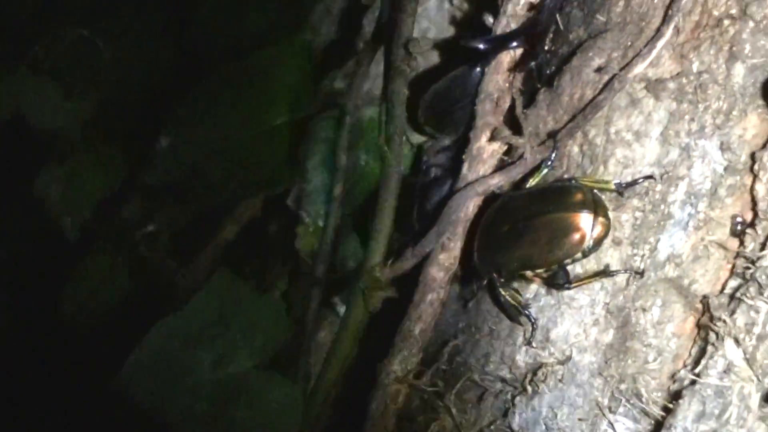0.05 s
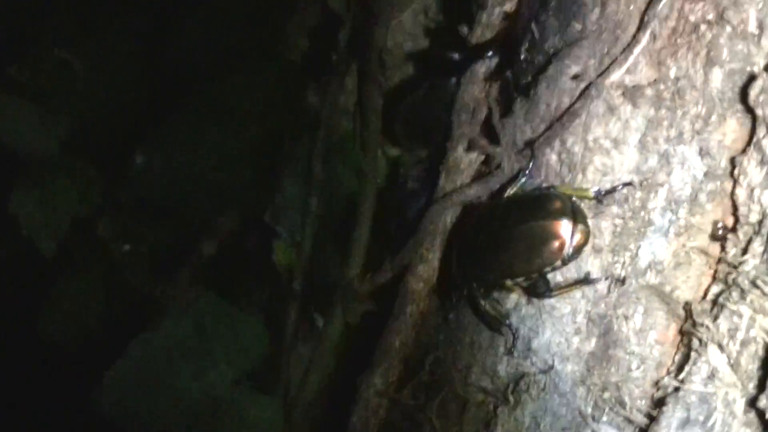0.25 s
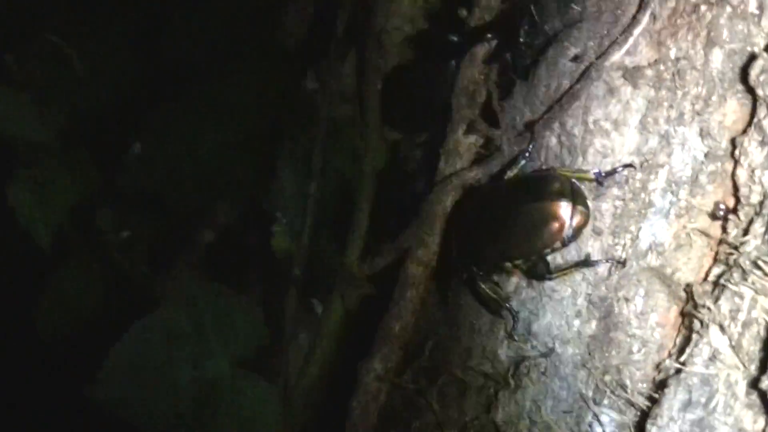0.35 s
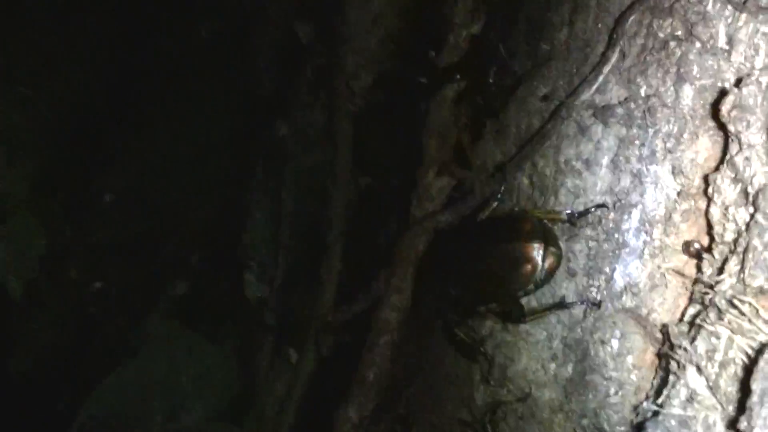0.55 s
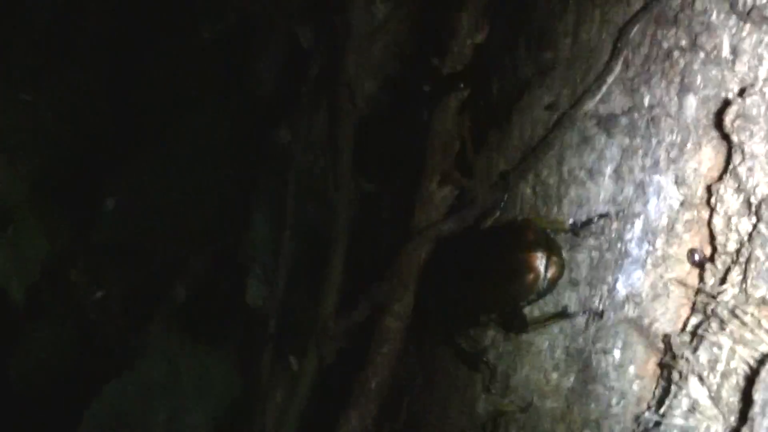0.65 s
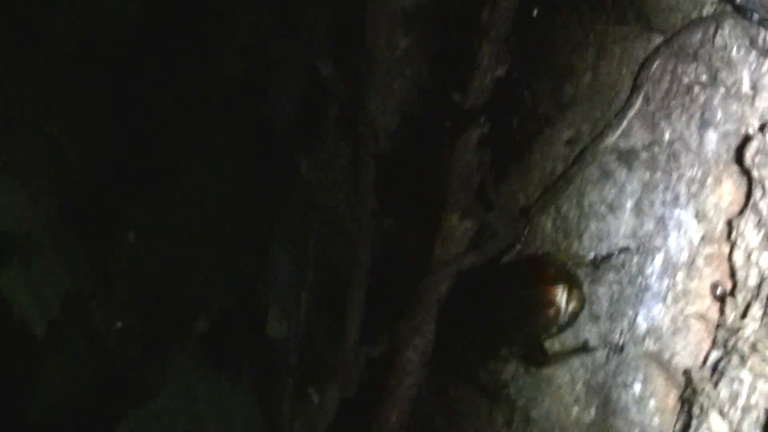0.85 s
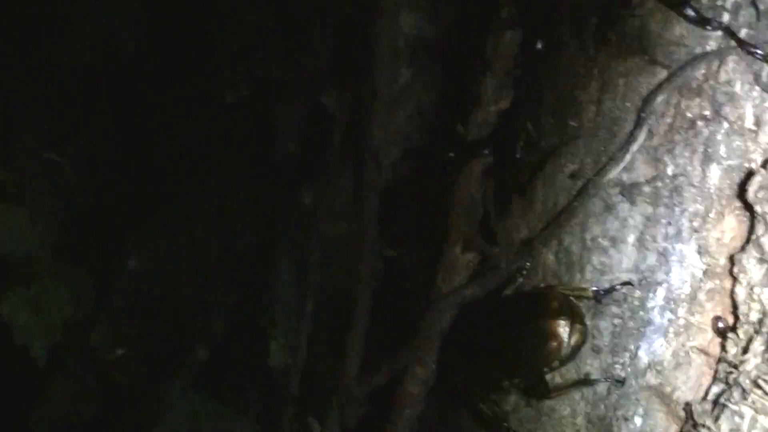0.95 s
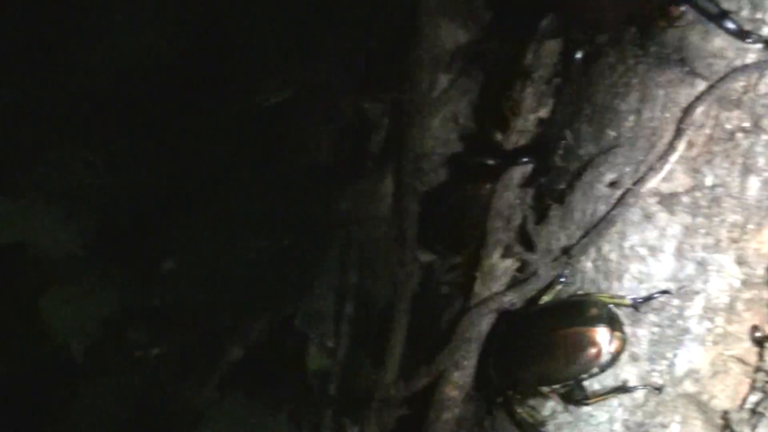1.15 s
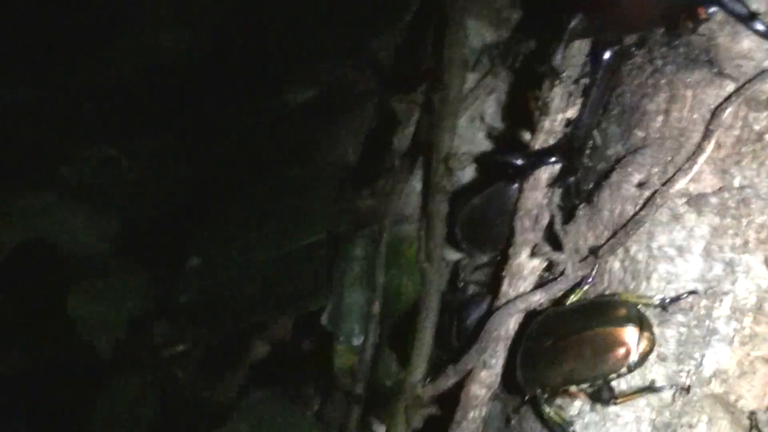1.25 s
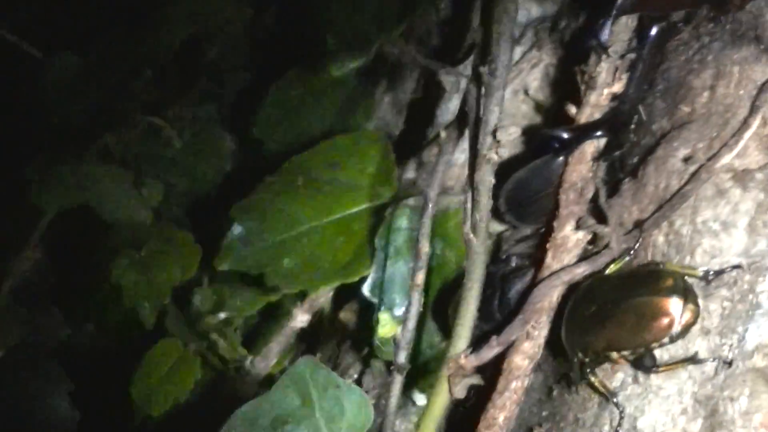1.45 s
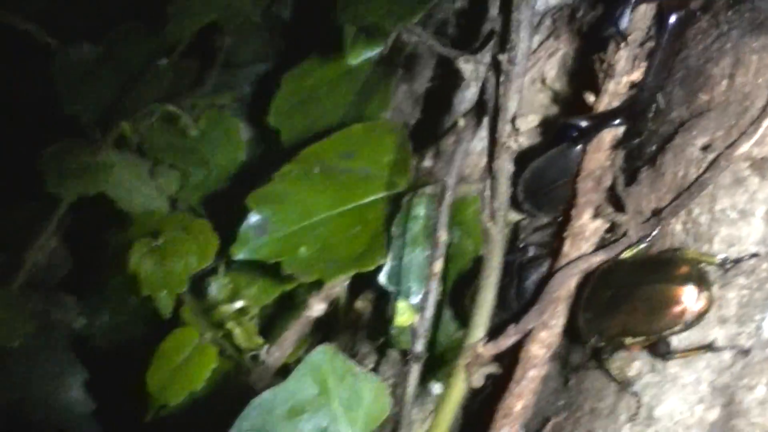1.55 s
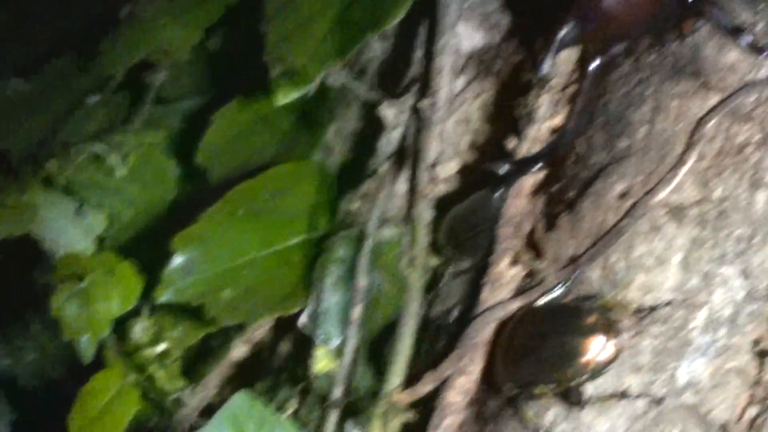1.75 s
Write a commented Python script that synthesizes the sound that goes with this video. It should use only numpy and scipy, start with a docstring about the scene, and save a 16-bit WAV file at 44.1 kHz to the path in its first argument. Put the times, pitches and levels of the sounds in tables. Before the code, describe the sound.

Close handling noise on a small hard casing: a sharp snap, scattered light ticks, then a cluster of clicks with a scrape and a brief rustle. Behind it, a quiet wood at night rumbles low, with distant trilling and high insect buzzes.

```python
"""A low rumble with a faint hum, far trilling crickets and very high bush-cricket buzzes: a wood at night.
The buzzes are tooth strikes ringing tiny wings; a second insect gives one hissing call.
Close by, small clicks, creaks and scrapes, as of a camera and lamp being handled, all ring one small
hard casing; one snap is far louder than the rest. Near the end something soft brushes past."""
import sys
import numpy as np
from scipy import signal
from scipy.fft import rfft, irfft, next_fast_len
from scipy.io import wavfile

SR = 44100
rng = np.random.default_rng(int(sys.argv[2]) if len(sys.argv) > 2 else 0)


def unload_wav(signal):
    """Save mono or channel-first audio to the path in sys.argv[1] as 16-bit WAV at rate SR, clipped to [-1, 1]."""
    wavfile.write(
        sys.argv[1],
        SR,
        np.round(np.clip(np.atleast_2d(signal).T, -1, 1) * 32767).astype(np.int16),
    )


N = 79380


def undb(db):
    """Decibels to gain."""
    return 10 ** (np.asarray(db) / 20)


def unit(x):
    """Scale to rms 1."""
    return x / np.sqrt(np.mean(x ** 2) + 1e-24)


def shape(x, response):
    """Filter by response(f), f in Hz."""
    size = next_fast_len(x.shape[-1] + 4096)
    f = np.fft.rfftfreq(size, 1 / SR) + 1e-6
    return irfft(rfft(x, size) * response(f), size)[..., :x.shape[-1]]


def resonance(f, hz, width_hz):
    """Response of one resonance, gain 1 at its centre."""
    return 1 / (1 + 1j * (f * f - hz * hz) / (f * width_hz))


def colour(x, points):
    """Filter by (frequency [Hz], gain [dB]) points, then scale to rms 1."""
    hz, db = np.array(points).T
    return unit(shape(x, lambda f: undb(np.interp(np.log(f), np.log(hz), db))))


def stereo_noise(correlation):
    """White noise, partly alike left and right."""
    mid, side = rng.standard_normal((2, N))
    return np.sqrt(1 + correlation) * mid + np.sqrt(1 - correlation) * side * np.array([[1], [-1]])


def drift(rate_hz):
    """Smooth random motion, rms 1."""
    return unit(shape(rng.standard_normal(N), lambda f: 1 / (1 + (f / rate_hz) ** 4)))


def swell(middle_s, length_s):
    """Half-cosine rise and fall."""
    return np.cos(np.pi * np.clip((np.arange(N) / SR - middle_s) / length_s, -.5, .5))


def add(track, x, start_s):
    """Mix a short sound into a track."""
    i = int(round(start_s * SR))
    track[i:i + len(x)] += x[:N - i]


def night_air():
    """Low rumble, thin hiss and a distant wavering hum."""
    # (frequency [Hz], relative density [dB])
    air_spectrum = [(20, -18.5), (45, -0.5), (100, -1), (200, -2), (400, -5), (700, -7.5), (1200, -13),
                    (2500, -17.5), (5000, -20.5), (8000, -21), (12000, -20.5), (15500, -38)]
    # (frequency [Hz], level [dB])
    hum_partials = [(100, -66), (200, -69.5), (300, -72.5), (402, -70)]
    air_db, swell_db, waver_hz = -50, -1.7, 3
    hum = 0
    for hz, db in hum_partials:
        phase = 2 * np.pi * np.cumsum(hz + waver_hz * drift(8)) / SR
        hum += undb(db) * np.sqrt(2) * np.sin(phase)
    air = colour(stereo_noise(0.24), air_spectrum)
    return air * undb(air_db + swell_db * drift(1)) + hum


def far_crickets():
    """Many distant trills merge into fluttering bands that slowly swell or sink."""
    # (centre [Hz], width [Hz], level [dB], flutter [dB], swell middle [s], swell [dB])
    choruses = [(3290, 200, -79, 3, 0.97, 12.5), (3835, 520, -67.5, 0, 1.9, 4.5),
                (5250, 750, -64, -4, .3, -1.5)]
    out = np.zeros((2, N))
    for hz, width_hz, db, flutter_db, middle_s, swell_db in choruses:
        band = shape(stereo_noise(0.69), lambda f: resonance(f, hz, width_hz) ** 2)
        trills = unit(band * undb(flutter_db * drift(27)))
        out += undb(db + swell_db * swell(middle_s, length_s=3.8)) * trills
    return out


def bush_crickets():
    """Fast tooth strikes ring a tiny wing: a comb of harmonics, each fading in and out through foliage."""
    # (middle [s], length [s], strike rate [Hz], wing pitch [Hz], level [dB])
    buzzes = [(.05, 1, 362, 12250, -63.5), (.5, .45, 369, 12500, -79), (0.843, 0.43, 370, 12650, -56),
              (1.25, 0.31, 372, 12100, -61.5), (1.75, 0.61, 370.5, 12450, -55)]
    harmonic_count, wing_width_hz = 11, 1500
    foliage_db, foliage_hz = 3, 22
    waver, jitter = .001, .0022  # fractions of the strike rate
    fades = [undb(foliage_db * drift(foliage_hz)) for _ in range(harmonic_count)]
    out = np.zeros((2, N))
    for middle_s, length_s, rate_hz, wing_hz, db in buzzes:
        strike_hz = rate_hz * (1 + waver * drift(8.3) + jitter * drift(210))
        phase = 2 * np.pi * np.cumsum(strike_hz) / SR
        lowest_harmonic = round(wing_hz / rate_hz) - harmonic_count // 2
        buzz = 0
        for k, fade in enumerate(fades, start=lowest_harmonic):
            wing_gain = abs(resonance(k * rate_hz, wing_hz, wing_width_hz))
            buzz += wing_gain * fade * np.sin(k * phase + 2 * np.pi * rng.random((2, 1)))
        out += undb(db) * swell(middle_s, length_s) * unit(buzz)
    return out


def touch(x, treble_hz, bass_hz, spot_hz, accent_db):
    """A soft contact loses treble, a light one loses bass; the touched spot adds an accent."""
    def response(f):
        low, high = 1j * f / treble_hz, 1j * f / bass_hz
        band = high ** 2 / (1 + high) ** 2 / (1 + np.sqrt(2) * low + low ** 2)
        return band * (1 + undb(accent_db) * resonance(f, spot_hz, width_hz=400))
    return shape(x, response)


def clicks():
    """Short pushes, each crunching as the contact gives way; returns forces on casing and stiff part."""
    # (time [s], relative level [dB], treble limit [Hz], bass limit [Hz], spot pitch [Hz],
    #  spot accent [dB], share to stiff part [dB])
    pushes = [(0.0804, -31, 2600, 1400, 1870, 9, -10), (0.2151, -15, 5400, 1180, 2180, -1, -6),
              (0.2177, -5, 9000, 910, 1180, 0.5, -4), (0.2187, -5.5, 2260, 1115, 1750, 0.5, -7.5),
              (0.2212, -25, 5000, 1200, 3000, -9, -12), (0.3499, -31, 4500, 1000, 1780, 4, -19),
              (0.3571, -27.5, 10000, 2500, 5070, 0, -12), (0.4723, -37.5, 3500, 700, 1630, 5, -32),
              (0.4809, -34.5, 3500, 700, 2800, 1.5, -20), (0.4896, -36.5, 3500, 700, 1700, 8, -20),
              (0.4975, -36, 3500, 700, 2300, -1, -18), (0.5324, -37, 9000, 2000, 5500, 6, -20),
              (0.5385, -31.5, 7900, 1500, 5400, 5, -6), (0.5494, -32.5, 4500, 900, 2930, -1, -20),
              (0.5533, -33, 8950, 2800, 5200, 18, -20), (0.5612, -25.5, 4430, 690, 2780, -22, -22),
              (0.6223, -21, 4500, 500, 1600, -8, -23), (0.6347, -28.5, 3480, 505, 1510, -1, -22),
              (0.6722, -31, 3500, 500, 1500, 0, -20), (0.6795, -33, 3980, 500, 2800, -10, -20),
              (0.6902, -37, 5000, 900, 1500, -1, -20), (0.6929, -27.5, 8000, 2500, 5200, 9.5, -20),
              (0.7316, -28.5, 3800, 497, 1500, -10, -26), (0.7456, -20.5, 3160, 520, 1490, -9, -20),
              (0.7661, -19.5, 2950, 517, 1500, -9.5, -18), (0.7969, -19, 2960, 496, 900, -14, -19),
              (0.9207, -35.5, 4550, 800, 2200, -3, -29), (1.1487, -30.5, 2700, 500, 880, 3.5, -6.5),
              (1.2674, -25, 3500, 1800, 3050, 8, -18), (1.2692, -21.5, 3380, 1490, 3100, -3, -5),
              (1.2841, -19.5, 3300, 1450, 2550, -15, 0), (1.3127, -22, 7140, 700, 1170, -1, -18),
              (1.3141, -17, 6600, 1180, 2870, 8, -14.5), (1.3183, -33, 4000, 1000, 1500, 16, -10),
              (1.3242, -34, 3950, 1200, 2500, -5, -10), (1.3947, -31, 5000, 1490, 3700, 11.5, -20)]
    gain_db = 23.5
    crunch_gain, crunch_decay_s, crunch_highpass_hz = .2, 0.00057, 3500
    casing_force, stiff_force = np.zeros((2, N))
    impulse = signal.unit_impulse(256, 8)
    age_s = (np.arange(len(impulse)) - np.argmax(impulse)) / SR
    crunch_envelope = crunch_gain * (age_s > 0) * np.exp(-age_s / crunch_decay_s)
    for time_s, db, *contact, stiff_db in pushes:
        crunch = crunch_envelope * rng.standard_normal(len(age_s))
        crunch = shape(crunch, lambda f: f ** 2 / (f ** 2 + crunch_highpass_hz ** 2))
        push = undb(db + gain_db) * touch(impulse + crunch, *contact)
        add(casing_force, push, time_s)
        add(stiff_force, undb(stiff_db) * push, time_s)
    return casing_force, stiff_force


def ring_modes(force, modes):
    """A force rings a set of modes, each with its own left-right balance."""
    sides = np.array([[.5], [-.5]])
    return shape(force, lambda f: sum(undb(db + sides * balance_db) * resonance(f, hz, width_hz)
                                      for hz, width_hz, db, balance_db in modes))


def scatter(ring):
    """Short diffuse tail of vibration scattered in the casing."""
    t60_s, rise_s, treble_hz, tail_db = 0.044, 0.0014, 5960, -14
    t = np.arange(SR // 10) / SR
    envelope = np.exp(-np.log(1000) * t / t60_s) * (1 - np.exp(-t / rise_s))
    tail = shape(rng.standard_normal((2, len(t))) * envelope, lambda f: 1 / (1 + 1j * f / treble_hz))
    tail = undb(tail_db) * unit(tail) / np.sqrt(len(t))
    return signal.fftconvolve(ring, tail, axes=1)[:, :N]


def casing(casing_force, stiff_force):
    """Pushes ring the casing with a scattered tail; its stiff part rings on, clean."""
    # all three: (frequency [Hz], width [Hz], gain [dB], left minus right [dB])
    casing_modes = [(443, 70, -6.5, 9), (590, 81, -8, -16), (862, 198, -2, 0.5), (1190, 290, -15.5, -7.5),
                    (1462, 355, -8, -1.5), (1756, 204, -7, -3.5), (2101, 202, 0.5, -5.5),
                    (2400, 100, -12.5, -12.5), (2950, 210, -7, -7), (3430, 200, -20, -9),
                    (3770, 230, -11.5, 14), (4400, 270, -16.5, -1)]
    contact_modes = [(5460, 500, -24.5, -13), (6330, 340, -21.5, -5), (8320, 1300, -15.5, -5),
                     (9940, 340, -24, -11)]
    stiff_modes = [(2112, 11, -6, -8), (2144, 30, 3.5, -8), (2222, 91, 1.5, -21.5), (2380, 88, -12, -5),
                   (2610, 62, -13, -7), (4280, 64, -14, 25), (6620, 110, -21, -14)]
    # all-pass bands that smear each push in time: (centre [Hz], width [Hz])
    dispersion = [(1200, 910), (2150, 1670), (3300, 1130), (4200, 1100), (6200, 990), (9000, 1200),
                  (12500, 1200)]
    # microphone's treble roll-off, dulling the clicks above 10 kHz: (frequency [Hz], gain [dB])
    mic_rolloff = [(20, 0), (10200, -3), (11200, -9), (13000, -7), (14200, -18), (16000, -28)]
    left_lag_s = 20e-6

    def response(f):
        smear = np.prod([1 - 2 * resonance(f, hz, width_hz) for hz, width_hz in dispersion], axis=0)
        return smear * undb(np.interp(f, *np.array(mic_rolloff).T))

    ring = ring_modes(casing_force, casing_modes + contact_modes)
    ping = ring_modes(stiff_force, stiff_modes)
    left, right = shape(ring + scatter(ring) + ping, response)
    return np.array([shape(left, lambda f: np.exp(-2j * np.pi * f * left_lag_s)), right])


def scrapes():
    """Swelling runs of tiny uneven slips; returns the force on the casing."""
    # (start [s], length [s], level [dB], treble limit [Hz], bass limit [Hz], spot pitch [Hz],
    #  spot accent [dB])
    strokes = [(0.088, 0.072, -45.5, 3000, 1000, 2000, -11), (0.254, 0.053, -42, 3500, 1400, 2170, 0),
               (.300, 0.067, -33.5, 4080, 910, 2920, -16), (0.388, 0.028, -42.5, 3500, 800, 1500, -11),
               (.465, 0.092, -47.5, 3480, 600, 1400, 6), (.508, .058, -33.5, 6370, 890, 5300, -3),
               (0.624, 0.094, -37.5, 2840, 497, 1050, -1), (1.138, 0.031, -41, 2830, 500, 900, -7.5),
               (1.334, 0.027, -20, 1880, 960, 1960, 2.5), (1.351, 0.11, -38, 4600, 600, 1310, -9)]
    slips_per_s, spread_db = 3300, 1.5
    force = np.zeros(N)
    for start_s, length_s, db, *contact in strokes:
        n = int(length_s * SR)
        slipping = rng.random(N) < slips_per_s / SR
        slips = (slipping * undb(spread_db * rng.standard_normal(N)))[:n]
        stroke = unit((slips - slips.mean()) * np.sin(np.linspace(0, np.pi, n)))
        add(force, undb(db) * touch(stroke, *contact), start_s)
    return force


def hissing_insect():
    """One call: a high band of rough noise rises and falls."""
    level_db, roughness_db = -52.5, 2
    rough = stereo_noise(0.092) * undb(roughness_db * drift(150))
    hiss = unit(shape(rough, lambda f: resonance(f, hz=11030, width_hz=2100) ** 2))
    return undb(level_db) * swell(middle_s=1.042, length_s=0.42) * hiss


def rustle():
    """Something soft brushes past, grainy and growing, then stops."""
    # (time [s], level [dB])
    envelope = [(1.361, -55), (1.40, -50), (1.46, -46), (1.506, -43.5), (1.53, -54.5), (1.56, -63)]
    # (frequency [Hz], relative density [dB])
    rustle_spectrum = [(300, -4.5), (800, -1.5), (2200, 1.5), (4000, -0.5), (6000, -3), (7300, -6.5),
                       (9500, -4.5), (12000, -14), (16000, -22)]
    grain_db = 1.5
    level_db = np.interp(np.arange(N) / SR, *np.array(envelope).T, left=-np.inf, right=-np.inf)
    grains = stereo_noise(0.2) * undb(grain_db * drift(300))
    return colour(grains, rustle_spectrum) * undb(level_db)


def scene():
    """Close handling sounds over the night wood."""
    click_force, stiff_force = clicks()
    wood = night_air() + far_crickets() + bush_crickets() + hissing_insect()
    return wood + rustle() + casing(click_force + scrapes(), stiff_force)


def record(dry):
    """Steep low-pass on the highest treble."""
    cutoff_hz = 15800
    return signal.sosfilt(signal.ellip(8, .2, 70, cutoff_hz, fs=SR, output="sos"), dry)


dry = scene()
out = record(dry)
unload_wav(out)
```